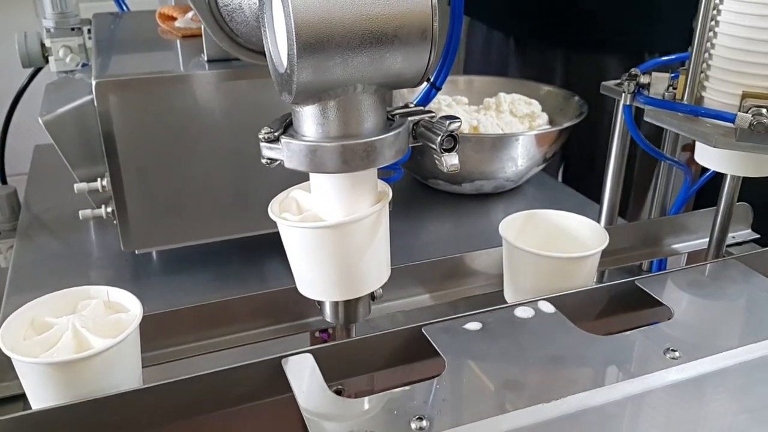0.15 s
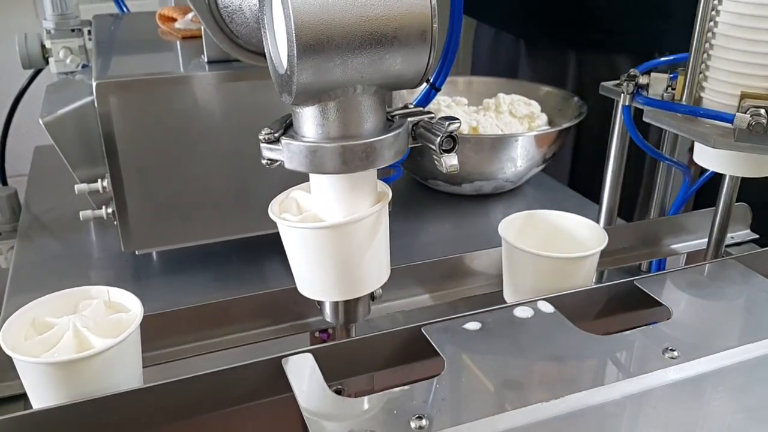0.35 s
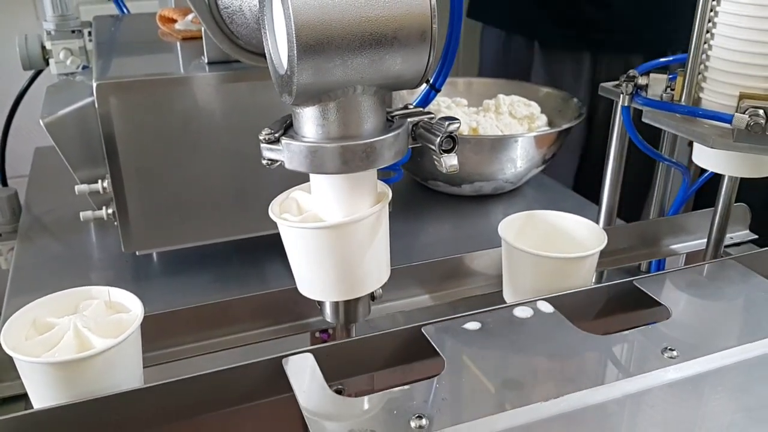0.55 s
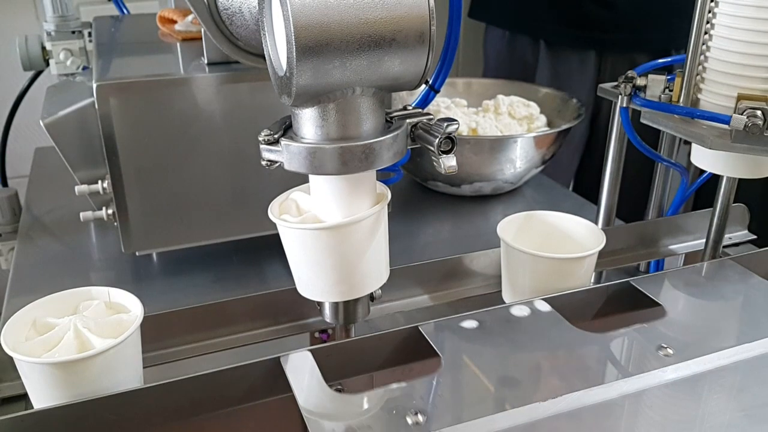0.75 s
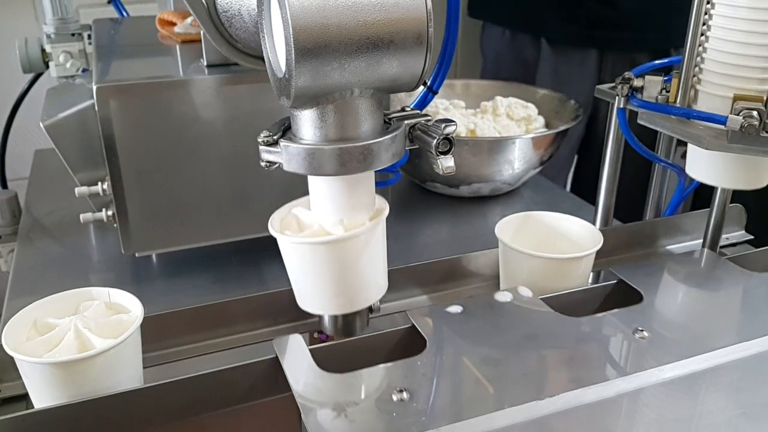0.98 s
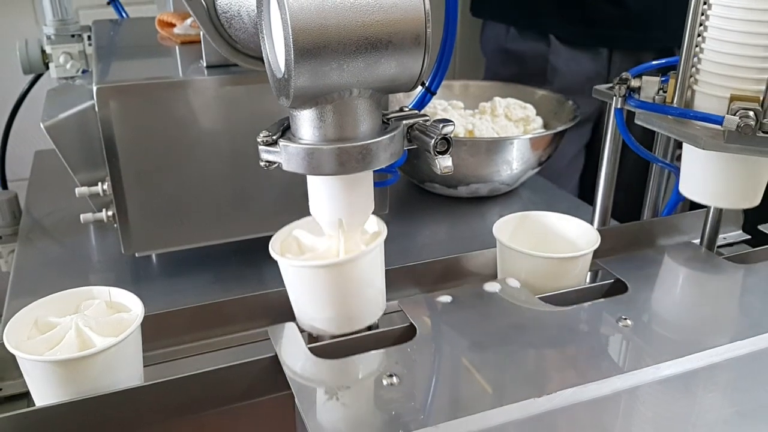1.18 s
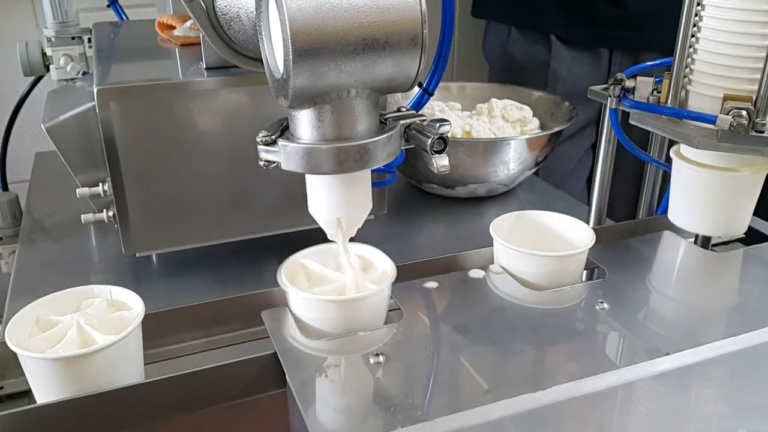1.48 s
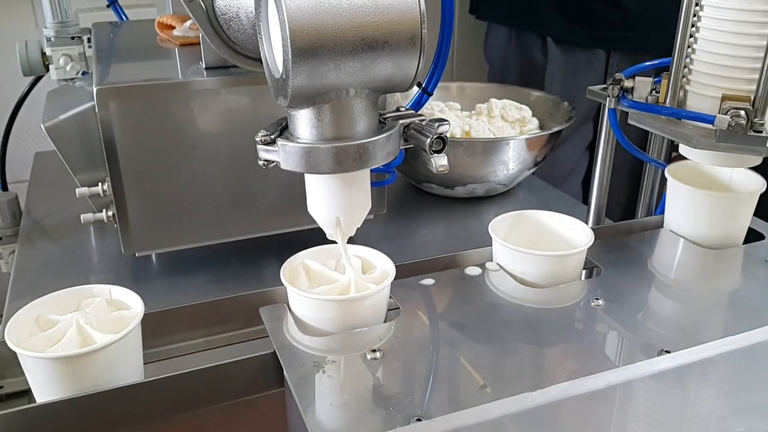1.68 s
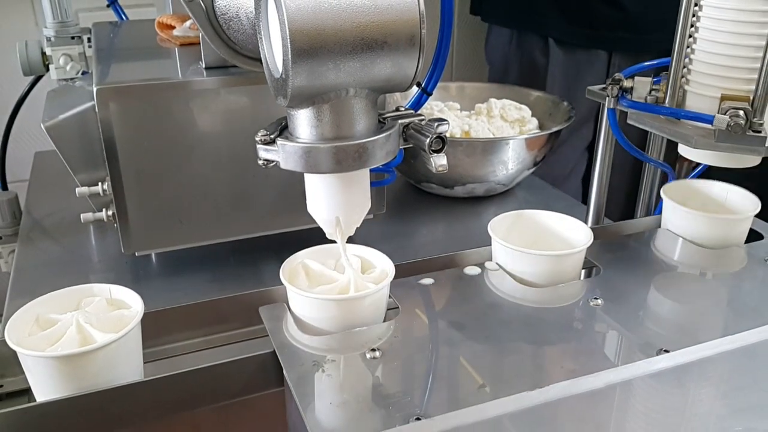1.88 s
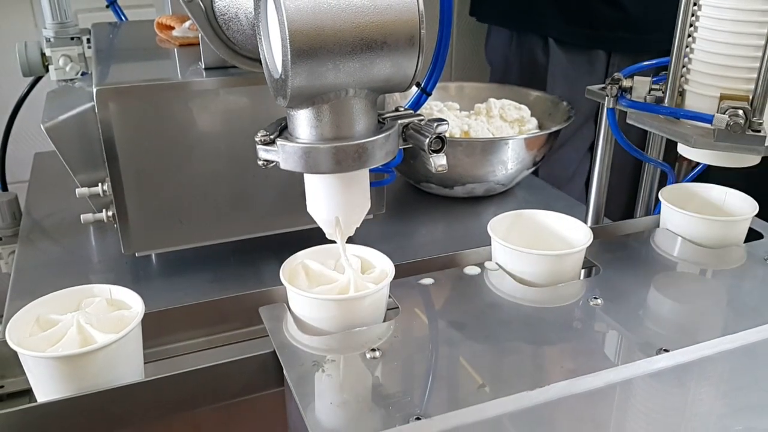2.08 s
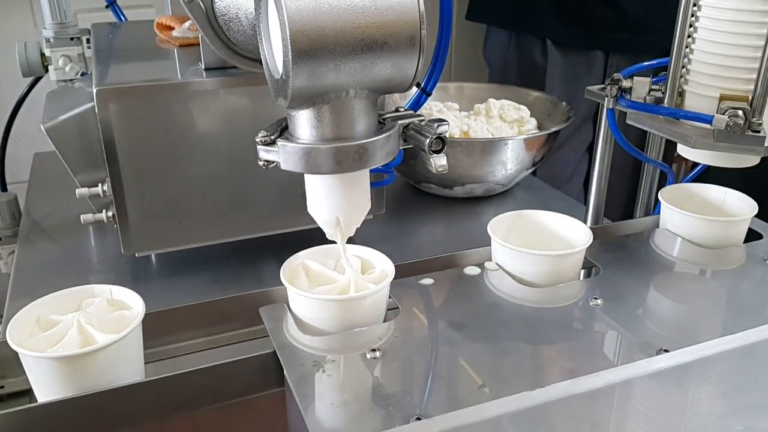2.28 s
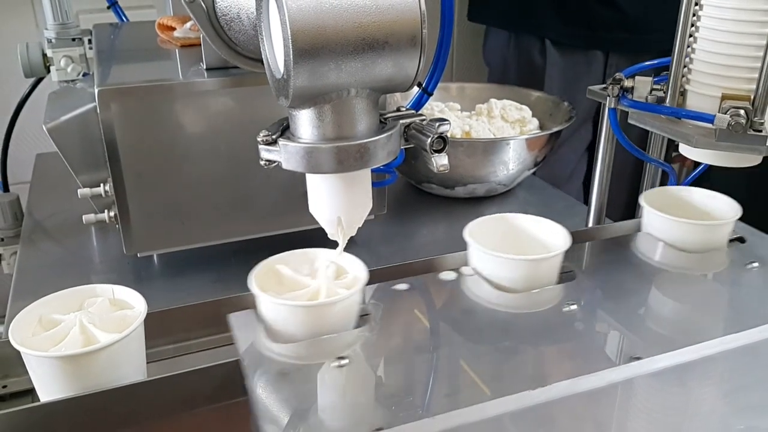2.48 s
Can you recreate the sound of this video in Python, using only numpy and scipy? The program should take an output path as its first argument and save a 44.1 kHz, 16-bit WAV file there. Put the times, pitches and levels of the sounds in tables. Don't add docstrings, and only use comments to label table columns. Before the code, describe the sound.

A pneumatic cup-filling machine hisses compressed air between hard metallic clunks and sharp taps

```python
import sys
import numpy as np
from scipy import signal
from scipy.fft import rfft, irfft, next_fast_len
from scipy.io import wavfile

SR = 44100
rng = np.random.default_rng(int(sys.argv[2]) if len(sys.argv) > 2 else 0)


def natural_amplitude(level_db):
    exponent = np.asarray(level_db, float) / 20
    return 10 ** exponent


def wav_out(sig):
    wavfile.write(sys.argv[1], SR, np.round(np.clip(np.atleast_2d(sig).T, -1, 1) * 32767).astype(np.int16))


N = 116865

LEAD = 8820
SIZE = next_fast_len(N + 3 * LEAD + SR)
HZ = np.maximum(np.arange(SIZE // 2 + 1) * SR / SIZE, 1)
T = (np.arange(N + LEAD) - LEAD) / SR
SIDES = np.array([[1], [-1]])

JET_OPEN_S, JET_SHUT_S, JET_RISE_S, JET_FALL_S = 0.29, 1.78, 0.017, 0.059
JET_DB, JET_SAG_DB_PER_S = -25.5, -0.5
# (frequency [Hz], density [dB per Hz])
JET_COLOUR = [(1900, -17), (2700, -8), (5200, -16.5), (7300, -21.5), (8000, -24.5), (11800, -30.5),
              (13200, -28.5), (15000, -22.5)]
# (frequency [Hz], width [Hz], level added on top of the broad colour [dB relative to it])
NOZZLE_PEAKS = [(2670, 330, -9.5), (4300, 730, 5), (2750, 440, -17), (6050, 410, 7.5), (6105, 950, 4.5),
                (6830, 670, 3), (9900, 1300, 3), (13300, 850, 7.5)]
# (frequency [Hz], width [Hz], gain [dB])
JET_HOLLOWS = [(2960, 730, -1), (4410, 150, 6), (5420, 195, -1.5), (7500, 270, -1)]

# (time [s], level [dB], rise [s], decay [s], tilt [dB per octave])
VALVE_PUFFS = [(-.03, -36, 0.0068, 0.036, -3.5), (0.208, -35.5, .001, 0.022, 5),
               (0.221, -27, .003, 0.036, -5.5), (0.294, -24, 0.0011, 0.012, 27),
               (.796, -19.5, 0.0072, 0.053, 1), (1.802, -21.5, 0.0027, 0.017, -1.5),
               (1.986, -25.5, 0.00077, 0.025, 1), (2.02, -34, 0.011, 0.089, -4.5),
               (2.209, -34.5, .0004, 0.057, 1), (2.298, -28, .001, 0.011, 20),
               (2.305, -20.5, 0.0037, 0.036, 2.5)]
# (frequency [Hz], density [dB per Hz])
PUFF_COLOUR = [(300, -19), (1700, 5.5), (3000, 2.5), (4500, 5.5), (7000, 0.5), (8000, -5), (12000, -6),
               (15000, -21.5)]
PUFF_GRAIN_DB = 1.5

# (time [s], base [dB], frame [dB], rail [dB], guards [dB])
END_STOPS = [(.206, -41, -31, -29, -28.5), (.221, -9.5, -34, -45, -26), (.227, -16.5, -56, -21.5, -30),
             (0.3, -39, -22, -21, -23), (0.306, -26.5, -14, -34, -29.5), (.652, -15.5, -32, -39, -31.5),
             (0.663, -14, -32, -50, -55), (0.792, -55, -19, -20, -22), (0.802, -18, -13.5, -12, -16.5),
             (0.82, -18, -17, -13, -39), (.845, -38, -25, -16.5, -32), (1.413, -27, -22, -25, -30),
             (1.445, -24, -38, -20.5, -50), (1.667, -27, -29, -29, -29.5), (1.789, -30, -39, -24, -26),
             (1.8025, -29, -20, -22, -20.5), (1.8072, -20, -17.5, -16, -15), (1.835, -41, -47, -24.5, -23),
             (2.206, -28, -33, -38, -28.5), (2.226, -17.5, -29.5, -26.5, -22),
             (2.303, -41, -16.5, -26, -35), (2.309, -35, -24, -20.5, -33)]
# (time [s], level [dB])
TRAY_THUDS = [(.221, -50), (0.304, -16.5), (0.321, -15), (.652, -23), (0.803, -19), (.830, -16),
              (1.413, -11), (1.428, -21), (1.444, -17), (1.480, -25.5), (1.668, -32), (1.690, -20.5),
              (1.799, -16.5), (2.306, -26)]
# (time [s], level [dB], shudder [s])
DROPPER_TAPS = [
    (1.589, -23.5, 0.02),
    (2.019, -30, 0.0011),
    (2.027, -23.5, 0.002),
    (2.038, -21.5, 0.0019),
    (2.045, -24, 0.018),
]
# (frequency [Hz], level [dB], t60 [s])
BASE_MODES = [(61, -21, 0.14), (110, -16, 0.11), (152, 1, 0.096)]
# (frequency [Hz], level [dB], t60 [s])
FRAME_MODES = [(400, -2, 0.08), (533, -9, .1), (425, -2, 0.1)]
# (frequency [Hz], level [dB], t60 [s])
RAIL_MODES = [(594, -2, 0.071), (633, 0, 0.034), (701, 0.5, 0.078), (703, -19, 0.13), (798, -10, 0.12),
              (1075, -12, 0.17)]
# (frequency [Hz], level [dB], t60 [s])
GUARD_MODES = [(921, 4, 0.044), (997, 3.5, 0.034), (1195, 1.5, 0.067), (1462, 0, 0.077), (2090, -5, 0.084),
               (2112, -1, 0.16), (2182, -7, 0.046), (2726, -3, 0.03)]
# (frequency [Hz], level [dB], t60 [s])
TRAY_MODES = [(196.5, -13.5, 0.053), (243, -3, 0.1), (295.2, -10, 0.19), (349, 5, 0.033)]
# (frequency [Hz], level [dB], t60 [s])
DROPPER_MODES = [(558.4, -6, 0.15), (1084, 1.5, 0.036), (1220, -8, 0.06), (1300, -4, 0.069),
                 (1493, -4, 0.094), (1620, 1, 0.096), (3350, -1.5, 0.023), (3650, 3.5, 0.035),
                 (4690, 3, 0.01), (6000, -8, 0.012)]
MODE_SCATTER_DB, SHUDDER_DB, SHUDDER_S = 1.5, -11.0, 0.014
LONGEST_RING_S, MOST_CYCLES = 0.5, 200

# (time [s], level [dB], decay [s])
SHEET_BUZZ = [
    (-.03, -23, 0.048),
    (.222, -30.5, 0.074),
    (.80, -23.5, 0.063),
    (0.401, -36.5, 0.033),
    (1.411, -39, 0.1),
    (1.53, -35, 0.34),
    (1.801, -27, 0.083),
    (2.027, -50, 0.02),
    (2.306, -34, 0.045),
]
BUZZ_LOW_HZ, BUZZ_HIGH_HZ, BUZZ_GRAIN_DB, BUZZ_RISE_S = 320, 2370, 2, 0.0018

# (time [s], peak [dB], frequency [Hz],
# t60 [s])
DRY_CLICKS = [(.215, -21, 65, 0.13), (0.796, -25, 70, 0.13), (1.799, -18, 89, 0.07),
              (1.8071, -12.5, 945, .05), (2.303, -26, 80, .1), (0.207, -38, 6350, 0.011),
              (1.586, -23, 1493, .03), (1.599, -21, 1710, .03), (1.9868, -17, 6380, 0.0092),
              (1.9868, -26, 10000, 0.0097), (1.988, -21, 1870, .02), (2.004, -25, 4460, 0.028),
              (2.0197, -8.5, 1300, 0.0095), (2.0194, -21, 3900, .012), (2.0257, -6, 1320, 0.015),
              (2.026, -20, 5600, .01), (2.0263, -17, 3850, 0.009), (2.031, -16, 1500, 0.026),
              (2.031, -20, 3910, 0.018), (2.0385, -24, 1380, 0.021), (2.045, -16, 1330, 0.023),
              (2.045, -36, 3650, 0.013), (2.2087, -30, 5900, .02), (2.209, -20, 1720, 0.013),
              (2.2082, -29, 11500, .008), (2.2231, -19, 1800, 0.03)]
# (time [s], peak [dB], frequency [Hz], t60 [s])
LONG_RINGS = [(.212, -25, 542, 0.16), (.301, -16.5, 420.6, 0.31), (.312, -22.5, 538, 0.35),
              (.302, -16.5, 942, 0.08), (.325, -28, 997, 0.21), (.797, -18.5, 677, 0.17),
              (.803, -16, 421, 0.29), (.806, -22.5, 539, 0.29), (.826, -18, 686, .25),
              (1.835, -24, 531, .3), (1.810, -33, 2047, .4), (2.032, -32, 534, 0.3),
              (2.305, -21, 422.5, 0.33), (2.307, -25, 528.5, 0.28), (2.310, -29, 2154, 0.42)]
CLICK_LAG_S = 0.0002

# (frequency [Hz], density [dB per Hz])
TONE_COLOUR = [(30, -13), (250, -15), (450, -5.5), (900, -7), (2400, -15), (2800, -19.5), (7000, -29),
               (8200, -41)]
TONE_DB, TONE_SWAY_DB = -41.5, 1.5
RUMBLE_HZ, RUMBLE_WIDTH_HZ, RUMBLE_IDLE_DB, RUMBLE_LOAD_DB = 158.5, 40, -52.5, -40.5
RUMBLE_LEFTOVER_DB, RUMBLE_LEFTOVER_S = -38.5, 0.19
DRONE_HZ, DRONE_WIDTH_HZ, DRONE_DB = 263, 210, -7

# (frequency [Hz], left-right likeness [0-1])
PORT_LIKENESS = [(60, 0.96), (200, 0.97), (400, 0.88), (700, 0.86), (1300, 0.0057), (15000, 0.008)]
# (frequency [Hz], left minus right [dB])
PORT_DIFFERENCE = [(100, 4), (1500, 3), (2900, 2.5), (4300, -5.5), (6100, -14.5), (7200, -12), (8000, 1),
                   (15000, -3)]
# (frequency [Hz], t60 [s])
ROOM_DECAY = [(100, 0.26), (1000, 0.35), (6000, 0.39), (15000, 0.23)]
ROOM_DB, JET_ROOM_DB, ROOM_GAP_S = -4.5, -1.5, 0.01
PANEL_FIRST_S, PANEL_ECHO_S, PANEL_ECHO_DB = 0.003, 0.014, -5
DIRECT_PAN_DB = 3.5
HISS_DB, CEILING = -55, 0.75


def jet():
    peaks = sum(natural_amplitude(db) * peak(hz, width_hz) for hz, width_hz, db in NOZZLE_PEAKS)
    edges_db = -20 * np.log10(1 + (1500 / HZ) ** 2 + (HZ / 15300) ** 60)
    hollows_db = sum(db * peak(hz, width_hz) for hz, width_hz, db in JET_HOLLOWS)
    jet_db = at_hz(JET_COLOUR) + 20 * np.log10(1 + peaks) + edges_db + hollows_db
    air = rms_one(colour(rng.standard_normal(len(T)), jet_db))
    flutter_db = 0.5 * drift(8.3) + 0.88 * drift(39)
    return air * jet_gate(JET_FALL_S) * natural_amplitude(JET_DB + JET_SAG_DB_PER_S * (T - 1.5) + flutter_db)


def jet_gate(fall_s):
    return (1 - dying(JET_OPEN_S, JET_RISE_S)) * dying(JET_SHUT_S, fall_s)


def panels(x):
    lags, sizes = rng.random((2, 24)), rng.standard_normal((2, 24))
    taps = np.zeros((2, 4000))
    taps[:, 0] = 1
    for port in range(2):
        at = ((PANEL_FIRST_S + lags[port] * PANEL_ECHO_S) * SR).astype(int)
        taps[port, at] = natural_amplitude(PANEL_ECHO_DB) * sizes[port] * (1 - 0.93 * lags[port])
    taps = taps / np.sqrt(np.sum(taps ** 2, axis=1, keepdims=True))
    return convolve(x, taps)


def puffs():
    out = 0
    white = rng.standard_normal((3, len(T))) * natural_amplitude(PUFF_GRAIN_DB * drift(450))
    for s, db, rise_s, decay_s, tilt_db in VALVE_PUFFS:
        air = rms_one(colour(white, at_hz(PUFF_COLOUR) + tilt_db * np.log2(HZ / 4000)))
        out = out + natural_amplitude(db) * air * np.clip((T - s) / rise_s, 0, 1) * dying(s, decay_s)
    return out


def blows():
    out = strike([(s, db, SHUDDER_S) for s, db in TRAY_THUDS], TRAY_MODES)
    for column, body in enumerate((BASE_MODES, FRAME_MODES, RAIL_MODES, GUARD_MODES), 1):
        out = out + strike([(row[0], row[column], SHUDDER_S) for row in END_STOPS], body)
    return out + buzz() + strike(DROPPER_TAPS, DROPPER_MODES) + clicks()


def strike(rows, body):
    out = np.zeros((2, len(T)))
    draws = rng.standard_normal((len(rows), len(body), 2))
    for m, (hz, mode_db, t60_s) in enumerate(body):
        shake, knock = np.full(len(T), 1e-18), np.zeros((2, len(T)))
        alike = np.clip(at_hz(PORT_LIKENESS, hz), 0, 1)
        for (s, db, shudder_s), draw in zip(rows, draws):
            size = natural_amplitude(db + mode_db - 5 + MODE_SCATTER_DB * draw[m, 0])
            at = int(s * SR) + LEAD
            age = T[at:at + LEAD] - s
            shake[at:at + LEAD] += size * np.exp(-age / shudder_s) / np.sqrt(shudder_s * SR / 2)
            lag = int((1 - alike) * abs(draw[m, 1]) * SR / hz / 2)
            knock[0, at] += size
            knock[1, at + lag] += size
        mid, side = rng.standard_normal((2, len(T)))
        shudder = natural_amplitude(SHUDDER_DB) * shake * two_ports(mid, side, alike)
        ring_s = min(t60_s, LONGEST_RING_S, MOST_CYCLES / hz)
        r, w = natural_amplitude(-60 / (ring_s * SR)), 2 * np.pi * hz / SR
        drive = (-1) ** m * knock + shudder
        out += signal.lfilter([0.5, 0, -0.5], [1, -2 * r * np.cos(w), r * r], drive)
    return out


def buzz():
    band = signal.butter(3, [BUZZ_LOW_HZ, BUZZ_HIGH_HZ], "band", fs=SR, output="sos")
    noise = rms_one(signal.sosfilt(band, wide_noise() * natural_amplitude(BUZZ_GRAIN_DB * drift(160))))
    level = 0
    for s, db, decay_s in SHEET_BUZZ:
        level = level + natural_amplitude(db) * np.clip((T - s) / BUZZ_RISE_S, 0, 1) * dying(s, decay_s)
    return noise * level


def clicks():
    out = np.zeros((2, len(T)))
    for s, db, hz, t60_s in DRY_CLICKS + LONG_RINGS:
        near = slice(int(s * SR) + LEAD, int((s + 2 * t60_s) * SR) + LEAD)
        age = T[near] - s - np.array([[0], [CLICK_LAG_S]])
        age = np.clip(age, 0, None)
        onset = np.clip(age * hz, 0, 1)
        out[:, near] += natural_amplitude(db - 60 * age / t60_s) * np.sin(2 * np.pi * hz * age) * onset
    return out


def room(x):
    noise, t, tail = wide_noise()[:, :SR], np.arange(SR) / SR, 0
    for low_hz in 40 * 2. ** np.arange(9):
        octave = [low_hz, min(2 * low_hz, 0.45 * SR)]
        band = signal.sosfilt(signal.butter(2, octave, "band", fs=SR, output="sos"), noise)
        t60_s = at_hz(ROOM_DECAY, 2.16 * low_hz)
        tail = tail + band * natural_amplitude(-60 * t / t60_s) / np.sqrt(t60_s)
    tail = tail * np.clip(t / ROOM_GAP_S - 1, 0, 1)
    return convolve(x, tail / np.sqrt(np.sum(tail ** 2) / 2))


def workshop():
    tone = natural_amplitude(TONE_DB + TONE_SWAY_DB * drift(5.7)) * rms_one(colour(wide_noise(), at_hz(TONE_COLOUR)))
    drone = natural_amplitude(DRONE_DB) ** 2 * peak(DRONE_HZ, DRONE_WIDTH_HZ)
    edges_db = -20 * np.log10(1 + (40 / HZ) ** 2 + (HZ / 900) ** 2)
    hump_db = 10 * np.log10(drone + peak(RUMBLE_HZ, RUMBLE_WIDTH_HZ)) + edges_db
    rumble = rms_one(colour(wide_noise(), hump_db)) * natural_amplitude(1.9 * drift(2.7))
    leftover = natural_amplitude(RUMBLE_LEFTOVER_DB) * dying(0, RUMBLE_LEFTOVER_S)
    load = natural_amplitude(RUMBLE_LOAD_DB) * jet_gate(0.033)
    return tone + rumble * (natural_amplitude(RUMBLE_IDLE_DB) + leftover + load)


def wide_noise():
    mid, side = rfft(rng.standard_normal((2, len(T))), SIZE)
    alike = np.clip(at_hz(PORT_LIKENESS), 0, 0.99)
    return irfft(two_ports(mid, side, alike), SIZE)[:, :len(T)]


def two_ports(mid, side, alike):
    return np.sqrt(1 + alike) * mid + np.sqrt(1 - alike) * side * SIDES


def drift(rate_hz):
    return rms_one(colour(rng.standard_normal(len(T)), -20 * np.log10(1 + (HZ / rate_hz) ** 2)))


def dying(s, decay_s):
    return np.exp(-np.clip(T - s, 0, None) / decay_s)


def peak(hz, width_hz):
    return 1 / (1 + (2 * (HZ - hz) / width_hz) ** 2)


def rms_one(x):
    return x / np.sqrt(np.mean(x ** 2) + 1e-20)


def at_hz(points, hz=HZ):
    points = np.array(points)
    return np.interp(np.log(hz), np.log(points[:, 0]), points[:, 1])


def colour(x, db):
    return irfft(rfft(x, SIZE) * natural_amplitude(db), SIZE)[..., :len(T)]


def convolve(x, response):
    return irfft(rfft(x, SIZE) * rfft(response, SIZE), SIZE)[:, :len(T)]


def scene():
    steady = jet()
    air = panels(steady) + natural_amplitude(JET_ROOM_DB) * room(steady)
    short, metal = puffs(), blows()
    rest = short[:2] + natural_amplitude(ROOM_DB) * room(short[2] + metal.mean(axis=0)) + workshop()
    ports_db = at_hz(PORT_DIFFERENCE) * SIDES / 2
    panned_metal = metal * natural_amplitude(DIRECT_PAN_DB * SIDES / 2)
    return (colour(air, ports_db) + colour(rest, 0.69 * ports_db) + panned_metal)[:, LEAD:]


def roll_off(x):
    return signal.sosfilt(signal.butter(12, 16460, fs=SR, output="sos"), x)


def record(dry):
    low_cut = signal.butter(2, 100.0, "high", fs=SR, output="sos")
    heard = signal.sosfilt(low_cut, dry) + natural_amplitude(HISS_DB) * rng.standard_normal(dry.shape)
    rounded = CEILING * np.tanh(heard / CEILING)
    top_cut = signal.ellip(8, 1, 45, 15750, fs=SR, output="sos")
    return roll_off(signal.sosfilt(top_cut, rounded))


dry = scene()
out = record(dry)
wav_out(out)
```